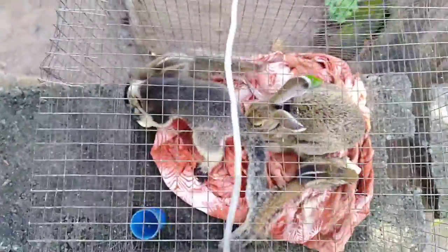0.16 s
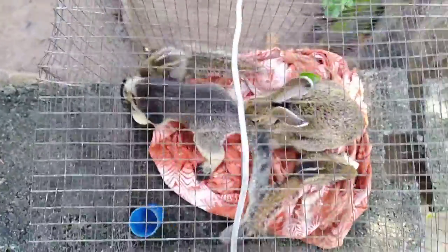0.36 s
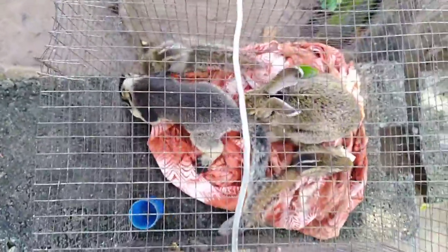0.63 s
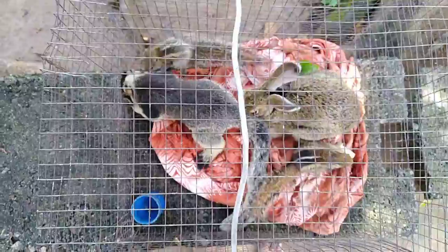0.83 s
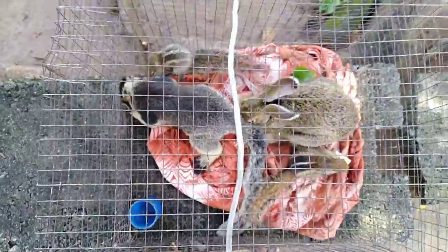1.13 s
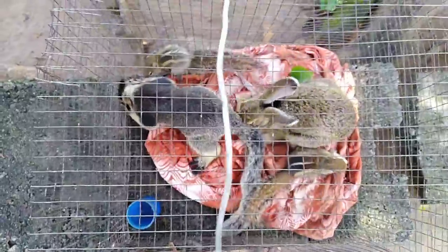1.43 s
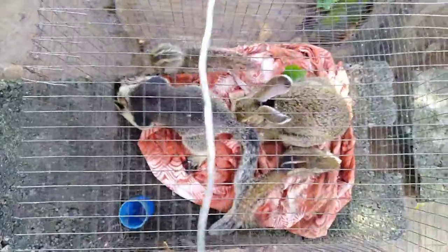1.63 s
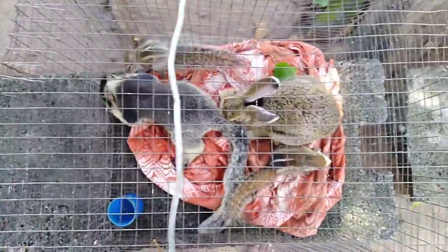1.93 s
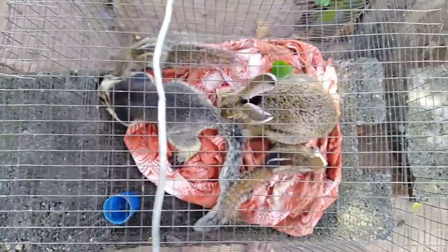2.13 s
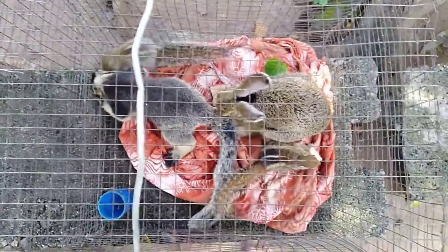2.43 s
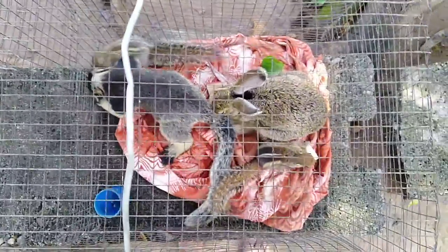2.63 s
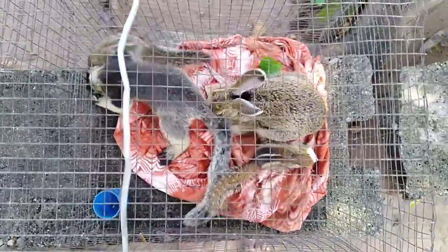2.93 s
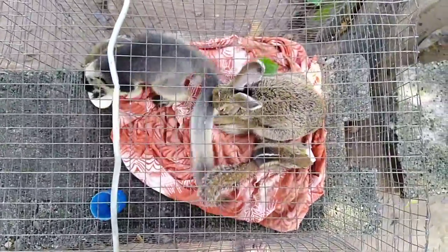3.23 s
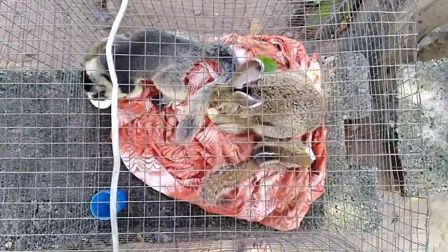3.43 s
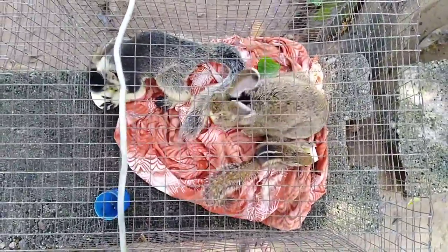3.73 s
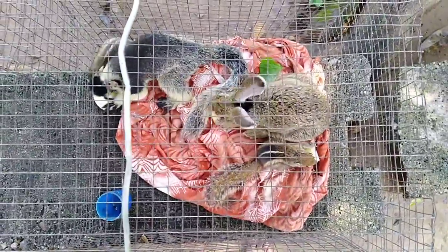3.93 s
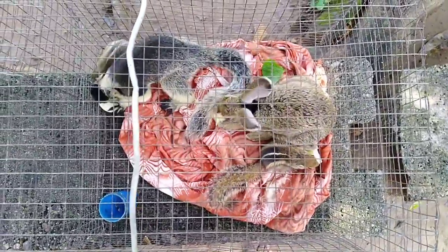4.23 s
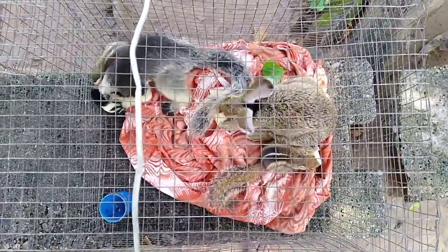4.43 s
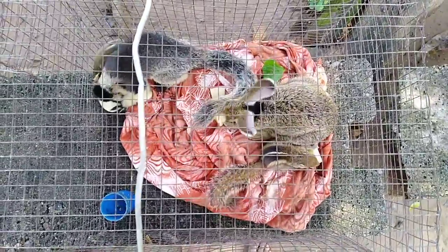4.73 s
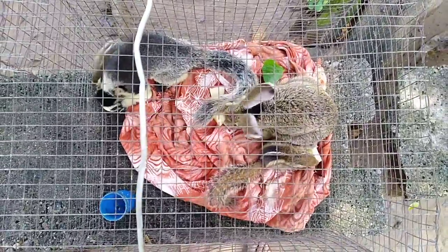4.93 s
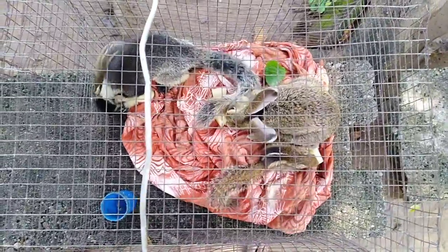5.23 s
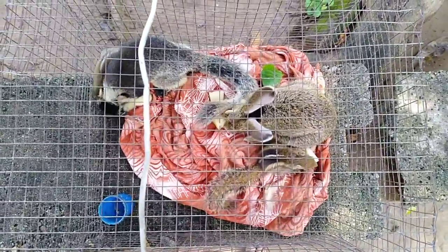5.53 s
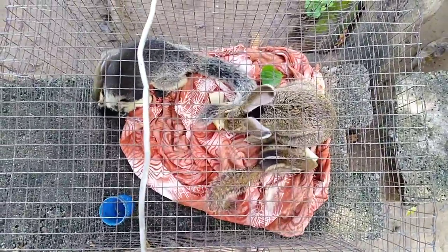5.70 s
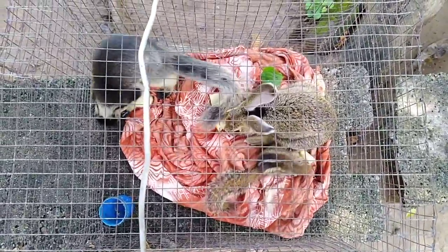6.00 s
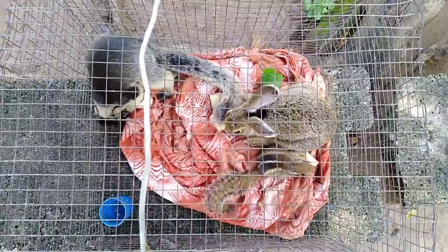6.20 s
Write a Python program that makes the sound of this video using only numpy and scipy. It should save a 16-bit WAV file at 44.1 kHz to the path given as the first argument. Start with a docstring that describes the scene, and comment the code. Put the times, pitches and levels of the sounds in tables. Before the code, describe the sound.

A few close bumps and rubs on the microphone are followed by a burst of high, fluttering squeaks from an animal in a wire cage. After that the animals move about lightly, with scattered claw ticks, soft taps and one knock, ending in a scratchy scramble and snapping wire. Pulsing insects and a low motor hum fill the yard throughout, with faint faraway roosters and three quick bird chirps.

```python
"""A young rabbit and squirrels in a wire cage: one animal gives trilled squeaks that set the mesh ringing.
Claws tick on the mesh, wires snap, feet tap and cloth rustles; a hand knocks on and brushes the microphone.
Around them the yard is full of shrilling insects (bands of throbbing noise) over a low motor rumble.
A small bird chips three times in quick gliding whistles; a faint noise flickers and far roosters crow."""
import sys
import numpy as np
from scipy import signal
from scipy.fft import rfft, irfft, next_fast_len
from scipy.io import wavfile

SR = 44100
rng = np.random.default_rng(int(sys.argv[2]) if len(sys.argv) > 2 else 0)


def dump_mix(stems):
    """Bounce the given channels to the path in sys.argv[1] as a 16-bit WAV at rate SR."""
    frames = np.atleast_2d(stems).T  # one column per channel
    limited = np.clip(frames, -1, 1)  # hard clip at full scale
    pcm = np.round(limited * 32767).astype(np.int16)
    wavfile.write(sys.argv[1], SR, pcm)


N = 280476
TIME = np.arange(N) / SR


def from_db(db):
    """Turn decibels into a number to multiply by."""
    return 10 ** (np.asarray(db) / 20)


def rms_one(x):
    """Scale a signal so that its average strength (rms) is 1."""
    return x / np.sqrt(np.mean(x ** 2) + 1e-20)


def in_time(rows):
    """Join a table's points with straight lines: one curve for each column after the time."""
    times, *columns = np.transpose(rows)
    return [np.interp(TIME, times, column) for column in columns]


def pan(db):
    """Left and right gains that make the left side louder by db."""
    gains = from_db(np.array([[db], [-db]]) / 2)
    return gains / np.sqrt(np.mean(gains ** 2))


def arrive(x, left_lag_s, right_lag_s):
    """Sound from one side reaches the further ear a little later."""
    return np.array([np.interp(TIME - lag, TIME, side) for lag, side in zip((left_lag_s, right_lag_s), x)])


def drift(rate):
    """A random wobble, about 1 in size, that changes rate times a second."""
    points = rng.standard_normal(8192)
    return rms_one(np.interp(TIME * rate, np.arange(len(points)), points))


def keep_part(x, part, hz, order):
    """Filter a sound to keep its "low", "high" or "band" part; a higher order cuts more steeply."""
    return signal.sosfilt(signal.butter(order, hz, part, fs=SR, output="sos"), x)


def tint(x, colour):
    """Give a sound a colour (how strong each frequency is), falling steeply past its ends; rms 1."""
    hz, db = np.transpose(colour)
    size = next_fast_len(N)
    freqs = np.maximum(np.fft.rfftfreq(size, 1 / SR), 1)
    gain = from_db(np.interp(np.log(freqs), np.log(hz), db))
    end_cut = (1 + (.6 * hz[0] / freqs) ** 4) * (1 + (.8 * freqs / hz[-1]) ** 8)
    return rms_one(irfft(rfft(x, size) * gain / end_cut, size)[..., :N])


def noise(colour, alike=0):
    """Coloured stereo noise; alike runs from 0 (unrelated sides) to 1 (the same on both)."""
    shared = np.sqrt(alike) * rng.standard_normal(N)
    separate = np.sqrt(1 - alike) * rng.standard_normal((2, N))
    return tint(shared + separate, colour)


def phase_of(hz):
    """Add up a changing pitch into the angle of its wave."""
    return 2 * np.pi * np.cumsum(hz) / SR


def rough(phase, width_hz):
    """Uneven vibration: noise gathered around a moving pitch, as strong as a sine of height 1."""
    a, b = rms_one(keep_part(rng.standard_normal((2, N)), "low", width_hz, order=3))
    return (a * np.sin(phase) + b * np.cos(phase)) / np.sqrt(2)


def stroke(start, attack, hold, t60):
    """A loudness curve that rises, holds and fades; t60 is the time it takes to fade by 60 dB."""
    age = TIME - start
    rise = np.sin(np.pi / 2 * np.clip(age / attack, 0, 1)) ** 2
    return rise * np.exp(-np.log(1000) * np.clip((age - attack - hold) / t60, 0, 2))


def note(start, length, start_hz, end_hz, arch_hz, peak_at, taper):
    """Pitch and loudness of one note: an arched glide that swells to a peak and fades."""
    progress = np.clip((TIME - start) / length, 0, 1)
    hz = start_hz + (end_hz - start_hz) * progress + arch_hz * np.sin(np.pi * progress)
    swell = np.interp(progress, [0, peak_at, 1], [0, 1, 0])
    return hz, np.sin(np.pi / 2 * swell) ** taper


def ring(x, hz, t60):
    """Ring at one pitch: a click of height 1 starts a fading sine of height 1."""
    fade, step = from_db(-60 / (t60 * SR)), 2 * np.pi * hz / SR
    return signal.lfilter([0, np.sin(step)], [1, -2 * fade * np.cos(step), fade * fade], x + 1e-18)


def strike(hits, tones):
    """Sharp blows set an object ringing at its own tones."""
    clicks = np.zeros(N)
    for start, db in hits:
        clicks[round(start * SR)] += from_db(db)
    return sum((-1) ** k * from_db(db) * ring(clicks, hz, t60) for k, (hz, db, t60) in enumerate(tones))


def rub(strokes, colour, grain_db, gain_db, pan_db, catch_db=2.0, catches_per_s=55):
    """Rubbing is many tiny, uneven slips; each stroke catches and frees itself as it goes."""
    slips = rng.standard_normal((2, N)) * from_db(grain_db * drift(900) + catch_db * drift(catches_per_s))
    level = np.sqrt(sum((from_db(db) * stroke(*shape)) ** 2 for *shape, db in strokes))
    return tint(slips, colour) * level * from_db(gain_db) * pan(pan_db)


def yard(x, t60, delay_s):
    """Scattered echoes from walls and trees, different on the left and right."""
    age = TIME[:SR]
    onset = np.clip(age / delay_s - 1, 0, 1)
    echoes = rng.standard_normal((2, SR)) * np.exp(-np.log(1000) * age / t60) * onset
    echoes /= np.sqrt(np.sum(echoes ** 2, axis=1, keepdims=True))
    return signal.fftconvolve(np.atleast_2d(x), echoes, axes=1)[:, :N]


# colour of the open air: (frequency [Hz], relative level [dB])
AIR_COLOUR = [(150, -7.5), (350, -5.5), (700, -11.5), (1100, -14), (2200, -21.5), (5000, -6.5), (9000, -20),
              (13000, -23)]
def air():
    """A faint, steady hiss fills the yard."""
    return from_db(-76.5) * noise(AIR_COLOUR, alike=0.08)


# colour of the rumble: (frequency [Hz], relative level [dB])
RUMBLE_COLOUR = [(22, -25), (42, -22), (50, -19), (58, -2), (75, -1), (95, 1.5), (122, -4.5), (145, -13.5),
                 (200, -32), (300, -43), (500, -46)]
# how the rumble swells and sinks: (time [s], level [dB])
RUMBLE_LEVEL = [(0, -50.5), (1.5, -48.5), (2.5, -51.5), (3.4, -51), (4.1, -49.5), (4.6, -50), (5.4, -48),
                (5.8, -49), (6.3, -50)]
# the motor's two hums: (pitch [Hz], pitch wobble [Hz], level wobble [dB])
HUM_TONES = [(64.4, 1.308, 1.5), (114.8, 1.775, 2)]
# how loud they are: (time [s], lower hum [dB], upper hum [dB])
HUM_LEVELS = [(0, -49, -46), (.9, -44.5, -67), (1.498, -48.5, -52), (2.4, -55, -65.5), (2.9, -52.5, -55.5),
              (3.599, -50, -60), (4.1, -47.5, -47.5), (4.549, -61, -61.5), (6.301, -58.5, -64.5)]
def motor():
    """Two wavering hums stand in a low rumble and sink into it towards the end."""
    hum = 0
    for (hz, wobble_hz, wobble_db), level_db in zip(HUM_TONES, in_time(HUM_LEVELS)):
        level = from_db(level_db + wobble_db * drift(7))
        hum += level * np.sin(phase_of(hz + wobble_hz * drift(7.3)))
    rumble = from_db(in_time(RUMBLE_LEVEL)[0] - 1) * noise(RUMBLE_COLOUR, alike=0.9)
    return (rumble + hum) * pan(-0.91)


# notes of the crowing: (start [s], length [s], first pitch [Hz], last pitch [Hz], arch [Hz],
# level [dB], hoarseness [0-1])
CROW_NOTES = [(1.089, 0.53, 700, 647, 2.5, -72, 0.6), (1.684, 0.37, 821, 831, 2.5, -66, 0.9),
              (1.892, 0.11, 601, 599, -0.5, -58, 0.85), (2.05, 0.18, 873, 934, -1.5, -71, 0.9),
              (2.273, 0.44, 746, 750, 15, -67.5, 0.6), (2.346, 0.5, 648, 616, 11.5, -61.5, 0.88),
              (2.661, 0.7, 616, 642.7, 25, -59.5, 0.9), (3.513, 0.53, 681, 659.4, 36.5, -56, 0.6),
              (3.893, 0.33, 680, 619, -2, -60, 0.77), (4.81, 0.049, 582, 530, 2, -70, 0.16),
              (5.257, 0.09, 574, 572, 1, -72.5, 0.4), (5.638, 0.6, 702, 636, 15, -74, 0.68)]
def roosters():
    """Gliding notes with a hoarse edge; distance leaves only their lowest band, smeared by echoes."""
    crow = 0
    for *shape, db, hoarse in CROW_NOTES:
        hz, swell = note(*shape, peak_at=0.48, taper=0.59)
        phase = phase_of(hz * (1 + 0.012 * drift(60)))
        clear = np.sqrt(1 - hoarse ** 2) * np.sin(phase)
        crow += swell * from_db(db) * (clear + hoarse * rough(phase, width_hz=80))
    crow = keep_part(crow, "band", [500, 930], order=4)
    return from_db(1.5) * crow + from_db(-7.5) * yard(crow, t60=0.19, delay_s=0.023)


def noise_band(level_db, hz, width_hz, gain_db, pan_db, throb_db, throbs_per_s=30):
    """One narrow band of noise whose level throbs at random."""
    edges_hz = [hz - width_hz / 2, hz + width_hz / 2]
    band = rms_one(keep_part(rng.standard_normal((2, N)), "band", edges_hz, order=3))
    return band * from_db(level_db + gain_db + throb_db * drift(throbs_per_s)) * pan(pan_db)


# band of the flicker: (centre [Hz], width [Hz], level [dB], left over right [dB])
FLICKER_BAND = (2123, 248.5, -98.5, 0.5)
def faint_flicker():
    """A faint, flickering narrow band of noise near 2.1 kHz."""
    return noise_band(0, *FLICKER_BAND, throb_db=8.0, throbs_per_s=24)


# colour of the lowest insect sound: (frequency [Hz], relative level [dB])
RASP_COLOUR = [(2400, -36.5), (3000, -10), (3500, -1.5), (4050, 8), (4350, 7), (4650, -13), (5200, -30),
               (7500, -70)]
# three higher voices, low to high: (centre [Hz], width [Hz], gain [dB], left over right [dB])
SHRILL_BAND = (6871, 412, 0.5, 0)
THIN_BAND = (9370.5, 460.5, 0.5, 14)
HIGHEST_BAND = (9779, 478.5, -1.5, 7)
# how each of the four swells and sinks: (time [s], level [dB])
RASP_LEVEL = [(0, -76), (.8, -63.5), (1.5, -61.5), (2.0, -63.5), (2.23, -61), (2.55, -58.5), (3.3, -69),
              (3.68, -66.5), (3.8, -69), (4.1, -63.5), (4.3, -64.5), (4.5, -67.5), (4.8, -64), (5.0, -72.5),
              (5.3, -62), (6.0, -64)]
SHRILL_LEVEL = [(0, -52), (.7, -56), (2.3, -55.5), (2.7, -62), (2.9, -57.5), (3.9, -59), (5.0, -64.5),
                (5.6, -61), (5.9, -68)]
THIN_LEVEL = [(0, -68.5), (.95, -74), (1.22, -63), (1.45, -79), (2.25, -79), (2.5, -72.5), (3.0, -72),
              (3.3, -69), (3.7, -66.5), (3.95, -88.5), (4.3, -76.5), (4.6, -63.5), (4.95, -75.5),
              (5.3, -76), (5.6, -91.5)]
HIGHEST_LEVEL = [(0, -71), (.9, -77), (1.2, -65.5), (1.5, -76.5), (1.8, -69.5), (2.4, -90), (3.2, -90),
                 (4, -88)]
def shrilling_insects():
    """Many small voices merge into three shrill bands over a restless rasp; the highest fades away."""
    rasp = noise(RASP_COLOUR) * from_db(in_time(RASP_LEVEL)[0] + 1.5 * drift(25)) * pan(12)
    shrill = noise_band(in_time(SHRILL_LEVEL)[0], *SHRILL_BAND, throb_db=1.9)
    thin = noise_band(in_time(THIN_LEVEL)[0], *THIN_BAND, throb_db=2.2)
    highest = noise_band(in_time(HIGHEST_LEVEL)[0], *HIGHEST_BAND, throb_db=2.2)
    return rasp + shrill + thin + highest


def phrasing(phrases, rest_db=-99):
    """Level in dB of an insect whose phrases swell, hold and ebb."""
    power = from_db(rest_db) ** 2
    for start, rise, hold, fall, db in phrases:
        end = start + rise + hold + fall
        effort = np.clip(np.minimum((TIME - start) / rise, (end - TIME) / fall), 0, 1)
        power += (from_db(db) * np.sin(np.pi / 2 * effort) ** 1.74) ** 2
    return 10 * np.log10(power)


# colour of the buzz: (frequency [Hz], relative level [dB])
BUZZ_COLOUR = [(3800, -40.5), (4400, -1.5), (4750, 2.5), (5100, 5), (5350, 3), (5900, -17), (6400, -14),
               (7400, -71)]
# band of the sizzle: (centre [Hz], width [Hz], gain [dB], left over right [dB])
SIZZLE_BAND = (5499, 519.5, -0.5, 7)
# when each insect sings: (start [s], rise [s], hold [s], fall [s], level [dB])
BUZZ_PHRASES = [(-.3, 0.15, 0.15, 0.18, -64), (.2, 0.28, 0.33, .2, -54), (.75, 0.34, 0.48, .3, -57.5),
                (1.3, 0.48, 0.078, .35, -56), (2.2, .1, 0.23, .2, -65), (2.35, 0.83, .3, .55, -53),
                (3.85, .15, .1, 0.12, -60.5), (4.28, 0.19, 0.18, 0.38, -54), (4.9, 0.52, .3, 0.44, -53)]
SIZZLE_PHRASES = [(-.3, 0.15, 0.15, 0.2, -61.5), (.22, .2, 0.67, 0.33, -51), (1.33, 0.32, 0.26, 0.37, -54),
                  (2.25, 0.075, 0.18, 0.11, -67), (2.45, 0.25, .03, 0.21, -52),
                  (2.8, 0.25, 0.04, 0.37, -54.5), (3.25, 0.18, 0.093, 0.76, -57.5),
                  (3.8, 0.29, .05, 0.09, -63.5), (4.3, 0.21, 0.13, 0.35, -58), (4.95, 0.37, 0.36, .32, -55)]
def buzzing_insects():
    """A buzz and a higher, narrower sizzle swell about once a second."""
    buzz = noise(BUZZ_COLOUR) * from_db(phrasing(BUZZ_PHRASES) + 0.6 * drift(23)) * pan(10)
    sizzle = noise_band(phrasing(SIZZLE_PHRASES), *SIZZLE_BAND, throb_db=1.0)
    return buzz + sizzle


# the bird's notes; the middle two join into one chip:
# (start [s], length [s], first pitch [Hz], last pitch [Hz], arch [Hz], level [dB])
CHIP_NOTES = [(4.391, 0.023, 5270, 4330, 3, -44.5), (4.484, 0.036, 4640, 6000, 98, -36.5),
              (4.504, 0.032, 5830, 4310, -200, -36.5), (5.398, 0.021, 5030, 2974, 1, -41)]
def small_bird():
    """Quick, mostly falling whistles, each with a weak tone an octave above."""
    song = 0
    for *shape, db in CHIP_NOTES:
        hz, swell = note(*shape, peak_at=0.42, taper=1.84)
        phase = phase_of(hz * (1 + 0.018 * drift(900)))
        song += swell * from_db(db) * (np.sin(phase) + from_db(-26) * np.sin(2 * phase))
    direct = arrive(song * pan(-2.5), left_lag_s=0.000288, right_lag_s=0)
    return from_db(5.5) * direct + from_db(-5.5) * yard(song, t60=0.83, delay_s=0.002)


# finger brushes and hand grips: (start [s], rise [s], hold [s], fade [s], level [dB])
BRUSH_STROKES = [(.099, 0.0042, 0.009, 0.12, -52.5), (.186, 0.0041, 0.0085, 0.056, -49),
                 (.241, 0.011, 0.013, 0.25, -45), (.255, 0.13, 0.087, 0.3, -42),
                 (.48, 0.032, 0.17, 0.43, -50.5)]
GRIP_STROKES = [(.07, 0.18, .03, 3, -55.5), (.67, 0.037, 0.025, 0.76, -56.5), (.82, 0.018, 0.042, .2, -65),
                (.98, 0.024, 0.18, .3, -68.5), (1.28, 0.013, 0.023, 0.65, -66), (1.45, 0.14, 0.18, .8, -68),
                (1.66, 0.037, 0.14, 0.69, -75), (1.9, 0.0073, 0.02, 0.48, -64.5),
                (4.05, 0.085, 0.027, .2, -72.5), (5.39, .02, 0.062, 0.13, -87)]
# their colours: (frequency [Hz], relative level [dB])
BRUSH_COLOUR = [(150, 5.5), (1000, -5), (2000, -10.5), (4000, -5.5), (6000, 3.5), (7500, 4.5), (9500, -6.5),
                (11500, -19), (12700, -32.5), (14000, -39)]
GRIP_COLOUR = [(100, -7), (180, 17), (450, -4), (900, -6), (1500, -36.5), (3000, -9.5)]
def hand_rubbing():
    """A finger slides over the microphone, and the hand settles on its case."""
    brush = rub(BRUSH_STROKES, BRUSH_COLOUR, grain_db=0, gain_db=3.5, pan_db=21.5)
    grip = rub(GRIP_STROKES, GRIP_COLOUR, grain_db=4.5, gain_db=7.5, pan_db=7.5, catch_db=5)
    return brush + grip


# knocks on the case: (time [s], thud level [dB], pitch [Hz], click level [dB], contact time [s])
KNOCKS = [(0.0976, -30, 204, -42.5, 0.00042), (0.119, -40, 406, -81, 0.00055),
          (0.1829, -25, 163, -42.5, 0.0015), (0.2416, -31, 340, -42.5, 0.00091),
          (0.257, -40, 484, -59, 0.0025), (0.293, -35.5, 220, -44, .001), (.308, -47, 202, -53, 0.0018),
          (0.777, -34.5, 184, -63, 0.0024), (0.825, -37.5, 222, -71, 0.0049),
          (1.294, -36, 254, -72, 0.0023), (1.682, -36.5, 151, -91, 0.0024),
          (1.915, -35.5, 188, -66.5, 0.0031), (4.106, -37, 151, -85, 0.0036),
          (5.392, -45, 247, -86, 0.0063)]
# colour of their clicks: (frequency [Hz], relative level [dB])
CLICK_COLOUR = [(250, -18), (500, 9), (1000, -25), (1900, -2), (4000, -12.5), (7500, -2.5), (10000, -15),
                (13000, -28)]
def hand_knocks(click_s=0.0031, tail_s=0.072, tail_db=-15):
    """Each knock on the microphone is a dry click and a short thud; a longer contact is duller."""
    thuds, click_level = np.zeros((2, N))
    for start, db, hz, click_db, contact_s in KNOCKS:
        onset = stroke(start, max(contact_s, .0005), hold=1, t60=1)
        thuds += strike([(start, db)], [(hz, 0, 0.02)]) * onset
        at = round(start * SR)
        age = TIME[:N - at]
        fade = np.exp(-age / click_s) + from_db(tail_db) * np.exp(-age / tail_s)
        click_level[at:] += from_db(click_db) * fade
    thuds = keep_part(thuds, "low", hz=750, order=2)   # skin softens the blow
    thuds = keep_part(thuds, "high", hz=70, order=2)   # the thuds carry no deep bass
    clicks = click_level * noise(CLICK_COLOUR, alike=1)
    return (from_db(5.5) * thuds + from_db(3) * clicks) * pan(15)


# the animals' movements: (start [s], rise [s], hold [s], fade [s], level [dB])
SHIFT_STROKES = [(.5, .15, .15, 0.76, -60.5), (1.1, 0.18, 0.26, 1, -76.5), (1.9, 0.19, 0.16, 0.64, -75.5),
                 (4.3, 0.12, 0.34, .5, -82.5), (5.15, 0.16, .1, .6, -84.5), (6.05, .04, 0.088, 0.54, -80.5)]
SHUFFLE_STROKES = [(2.53, 0.093, 0.061, 0.27, -59.5), (4.18, 0.033, .01, 0.17, -78),
                   (4.67, 0.028, 0.018, 0.097, -67), (5.72, 0.066, 0.0052, 0.3, -63.5)]
SCRAMBLE_STROKES = [(-.05, .04, 0.16, .4, -65.5), (5.82, 0.16, .02, .2, -65),
                    (5.99, 0.081, 0.17, 0.44, -54), (6.06, 0.03, 0.0045, 0.13, -48.5),
                    (6.21, 0.095, 0.049, 0.17, -46.5), (6.295, 0.041, 0.0022, 0.032, -38)]
# their colours: (frequency [Hz], relative level [dB])
SHIFT_COLOUR = [(180, 0.5), (300, -1.5), (500, 0), (850, -6), (1200, -13.5)]
SHUFFLE_COLOUR = [(400, 8), (800, 6), (1200, 11.5), (1700, 6), (2300, 5.5), (3500, 6.5), (6000, -42)]
SCRAMBLE_COLOUR = [(700, -42), (1500, -19.5), (2100, -11.5), (3200, 3.5), (4400, -3), (6000, -2),
                   (8500, -4.5), (11000, -21), (14000, -34)]
def rustling():
    """The animals rub on the cloth: dull, uneven shifting, soft shuffles and a bright scramble."""
    shifts = rub(SHIFT_STROKES, SHIFT_COLOUR, grain_db=2, gain_db=-1.5, pan_db=5,
                 catch_db=5.5, catches_per_s=30)
    shuffles = rub(SHUFFLE_STROKES, SHUFFLE_COLOUR, grain_db=-2, gain_db=-4, pan_db=9, catch_db=4)
    scramble = rub(SCRAMBLE_STROKES, SCRAMBLE_COLOUR, grain_db=0, gain_db=4, pan_db=4.5)
    return shifts + shuffles + scramble


# soft steps: (time [s], level [dB], pitch [Hz], ring time [s])
FOOT_TAPS = [(1.916, -57, 1050, 0.039), (2.144, -80, 1176, .04), (2.21, -68, 960, 0.047),
             (2.329, -68, 1370, 0.091), (2.576, -53, 1010, 0.044), (2.63, -53, 1380, 0.037),
             (4.223, -54, 1340, .03), (4.298, -55, 2260, .04), (4.681, -59.5, 1040, 0.089),
             (4.712, -53, 1280, 0.05), (4.856, -57.5, 1070, 0.047), (5.092, -59, 1140, 0.021),
             (5.095, -59, 1750, 0.041), (5.771, -51, 1500, 0.057), (5.813, -46.5, 1815, 0.038)]
def foot_taps():
    """Each step sets one short, hollow note ringing."""
    taps = 0
    for start, db, hz, t60 in FOOT_TAPS:
        taps += strike([(start, db)], [(hz, 0, t60)]) * stroke(start, attack=0.0031, hold=1, t60=1)
    return taps * pan(4.7)


# a foot lands: (time [s], level [dB])
LANDING_HIT = [(3.4828, -45.5)]
# the floor's own tones: (pitch [Hz], gain [dB], ring time [s])
FLOOR_TONES = [(452, 8.3, 0.04), (630, 14, 0.027), (963, 9.6, 0.019), (1320, 4.5, 0.036),
               (3730, 9.1, 0.014)]
# the foot skids: (start [s], rise [s], hold [s], fade [s], level [dB])
SKID_STROKES = [(3.484, 0.0081, 0.0072, 0.046, -37.5), (3.51, 0.032, 0.011, 0.14, -71)]
# colour of the skid: (frequency [Hz], relative level [dB])
SKID_COLOUR = [(500, -17), (2200, -4.5), (3400, 5.5), (5000, 3.5), (7000, 0), (9500, 4.5), (11000, -9),
               (14000, -13)]
def landing():
    """An animal's foot hits the floor, makes it ring and skids."""
    knock = strike(LANDING_HIT, FLOOR_TONES) * pan(2.1)
    return knock + rub(SKID_STROKES, SKID_COLOUR, grain_db=-3, gain_db=2.5, pan_db=2.5)


# claws on the mesh: (time [s], body level [dB], edge level [dB], decay time [s])
CLAW_TICKS = [(0.8144, -50, -74, 0.013), (1.32, -46.5, -55, 0.014), (1.477, -57, -82, 0.011),
              (1.57, -50.5, -62, 0.017), (1.778, -44.5, -53, 0.009), (1.847, -46.5, -56, 0.012),
              (2.0916, -45, -49.5, 0.017), (2.2828, -50, -55, 0.035), (2.555, -45, -51, 0.0056),
              (2.716, -49, -66, 0.016), (2.772, -59, -67, 0.0039), (2.904, -52.5, -82, 0.015),
              (3.3385, -55, -48, 0.0071), (3.7404, -43, -69.5, 0.0048), (4.296, -51, -82, 0.0036),
              (4.598, -51.5, -38.5, 0.0027), (4.687, -47, -75, 0.0024), (4.699, -37.5, -47, 0.0023),
              (4.93, -50.5, -68, 0.013), (5.095, -44.5, -68, 0.0046), (5.151, -46.5, -56, 0.011),
              (5.308, -47, -55, 0.0026), (5.615, -52, -54.5, 0.036), (5.7951, -59, -41.5, 0.0067),
              (5.994, -57, -38.5, 0.0033), (6.024, -50, -39.5, 0.0039)]
# colours of a tick's two parts: (frequency [Hz], relative level [dB])
BODY_COLOUR = [(1500, -32.5), (2400, -27), (3200, 0), (3800, 2.5), (4600, -1.5), (6000, 0), (7500, -18)]
EDGE_COLOUR = [(4000, -42.5), (7000, -5), (9000, 4.5), (11000, -49.5), (14000, -30)]
def claws(rise_share=0.42, body_gain_db=4, edge_gain_db=-2):
    """Each claw makes a short scratch with a woody body and a bright edge; longer ones start softer."""
    body_level, edge_level = np.zeros((2, N))
    age = TIME[:SR // 8]
    for start, body_db, edge_db, decay_s in CLAW_TICKS:
        scratch = (1 - np.exp(-age / (rise_share * decay_s))) * np.exp(-age / decay_s)
        at = slice(round(start * SR), round(start * SR) + len(scratch))
        body_level[at] += from_db(body_db + body_gain_db) * scratch
        edge_level[at] += from_db(edge_db + edge_gain_db) * scratch
    body = body_level * noise(BODY_COLOUR, alike=0.73) * pan(3.5)
    edge = edge_level * noise(EDGE_COLOUR, alike=0.99) * pan(-4)
    return body + edge


# sharp snaps: (time [s], level [dB])
SNAP_HITS = [(6.0785, -25), (6.0868, -17.5), (6.0915, -35), (6.096, -35), (6.3288, -19), (6.3302, -33)]
# the wire's own tones: (pitch [Hz], gain [dB], ring time [s])
WIRE_TONES = [(2580, -15.5, 0.0082), (3200, -9, 0.0056), (3750, -2.5, 0.0061), (4800, -1.5, 0.0033),
              (5040, -12, 0.0068), (6840, -11, 0.0033)]
def wire_snaps():
    """Each snap makes the cage wire ring high and very briefly."""
    return strike(SNAP_HITS, WIRE_TONES) * pan(11)


# the mesh's own tones: (pitch [Hz], gain [dB], ring time [s])
MESH_TONES = [(1750, 2, 0.43), (1890, 11, .25), (2050, -10, .4), (2139, -5, .4), (2430, 8, 0.26),
              (2670, 1, 0.26), (2660, -12, 0.31), (3010, -17, 0.32), (2780, -7.5, .3), (3150, -5, .3),
              (3400, -12, .25)]
def mesh_ringing(x):
    """The mesh picks up a sound at its own pitches and rings on after it."""
    return sum(ring(x, hz, t60) * from_db(db) * 2 * np.log(1000) / (t60 * SR) for hz, db, t60 in MESH_TONES)


# the squeaks: (start [s], length [s], first pitch [Hz], last pitch [Hz], arch [Hz], level [dB],
# loudest point [share of length], hoarseness [0-1], trill rate [Hz], wave bend [radians])
SQUEAK_NOTES = [(0.07, 0.014, 2430, 2470, 0, -54, .5, .4, 244, 0.054),
                (0.770, 0.042, 2730, 2677, 3, -34.5, 0.88, 0.4, 250, -0.37),
                (0.787, 0.033, 2810, 2726, 8.5, -26.5, 0.67, 0.4, 238, -0.097),
                (0.804, 0.023, 2880, 2950, -1, -34.5, 0.23, 0.9, 242, 0.24),
                (0.809, .028, 4310, 4400, 1, -47, .45, 0.7, 256, .5),
                (0.824, 0.039, 2720, 3357, 57, -37, .3, 0.77, 342, 0.31),
                (0.975, 0.038, 1876, 2100, 18.5, -47.5, .7, 0.3, 231, -0.064),
                (0.987, 0.075, 2145, 2128, 5.5, -36.5, 0.24, 0.2, 257, 0.59),
                (1.039, 0.024, 1880, 1710, 4.5, -48, .4, 0.5, 287, -.2),
                (1.06, 0.024, 1960, 1865, -2.5, -38, .3, 0.65, 294, -0.54),
                (1.076, 0.03, 1780, 2006, -27.5, -45.5, 0.6, 0.65, 300, -0.28),
                (1.09, .045, 2650, 3084, 86, -33, 0.34, 0.25, 282, 0.74),
                (1.134, 0.018, 2665, 2705, -0.5, -21.5, .35, 0.3, 202, 0.17),
                (1.137, .027, 3080, 3036, -1, -35, .5, 0.7, 250, -0.4),
                (1.156, 0.035, 2300, 1762, -3, -42.5, .45, 0.9, 283, 0.04),
                (3.381, 0.03, 2630, 2550, -5, -56, 0.46, 0.34, 237, 0.25),
                (3.414, 0.052, 2650, 2360, -4.5, -54, 0.41, 0.97, 228, 0.3)]
def squeaks(trill_depth=0.53, trill_rise_hz_per_s=2170, octave_db=-23, hiss_db=-11):
    """A high whistle chopped by a quickening flutter of the throat, which also bends its pitch."""
    whistle, rasp = 0, 0
    for start, length, *pitch, db, peak_at, hoarse, trill_hz, bend in SQUEAK_NOTES:
        hz, swell = note(start, length, *pitch, peak_at, taper=1.1)
        flutter_hz = trill_hz + trill_rise_hz_per_s * (np.clip(TIME - start, 0, length) - length / 2)
        flutter = phase_of(flutter_hz * (1 + 0.029 * drift(150)) * (TIME > start))
        phase = phase_of(hz) - bend * np.sin(flutter)
        level = swell * from_db(db) * (1 + trill_depth * np.cos(flutter)) / (1 + trill_depth)
        whistle += level * (np.sin(phase) + from_db(octave_db) * np.sin(2 * phase))
        # strained notes break up, with a hissy upper edge
        hiss = from_db(hiss_db) * rough(1.4 * phase, width_hz=900)
        rasp += level * hoarse * (rough(phase, width_hz=330) + hiss)
    # a tiny mouth gives out no low sound
    whistle, rasp = keep_part([whistle, rasp], "high", hz=1500, order=8)
    direct = whistle + from_db(-2) * (rasp + mesh_ringing(whistle + rasp))
    scattered = .85 * rasp + .2 * whistle   # the cage scatters the rasp more widely than the whistle
    return direct * pan(11) + yard(scattered, t60=0.65, delay_s=0.003) * pan(8)


def scene():
    """The yard, the hand on the microphone and the animals in the cage, all together."""
    far = arrive(motor() + roosters(), left_lag_s=0, right_lag_s=0.00028)
    outdoors = air() + far + faint_flicker() + shrilling_insects() + buzzing_insects() + small_bird()
    hand = hand_rubbing() + hand_knocks()
    cage = rustling() + foot_taps() + landing() + claws() + wire_snaps()
    cage_direct = arrive(cage, left_lag_s=0.0002746, right_lag_s=0)
    cage_echo = from_db(-8.5) * yard(cage, t60=0.36, delay_s=0.0059)
    return outdoors + hand + cage_direct + cage_echo + squeaks()


def record(dry):
    """The highest treble is cut off steeply."""
    cutoff_hz = 14300
    return signal.sosfilt(signal.ellip(10, .1, 80, cutoff_hz, fs=SR, output="sos"), dry)


dry = scene()
out = record(dry)
dump_mix(out)
```